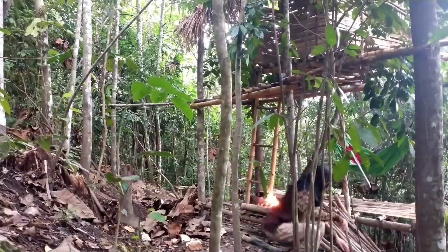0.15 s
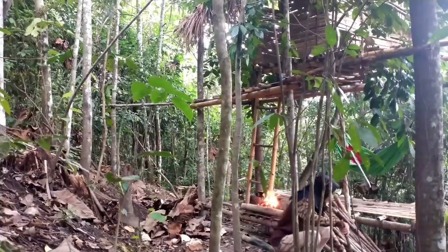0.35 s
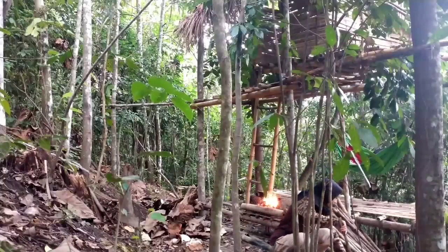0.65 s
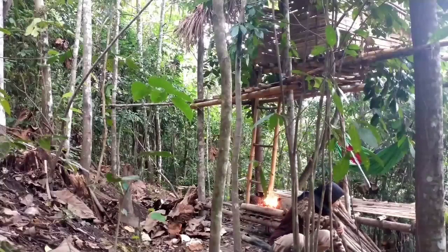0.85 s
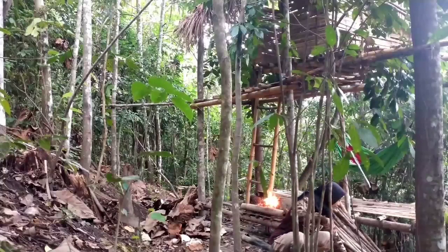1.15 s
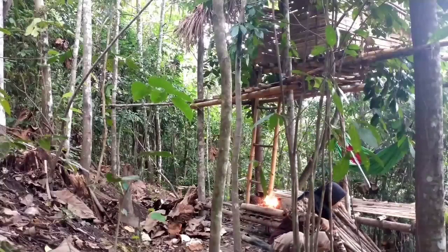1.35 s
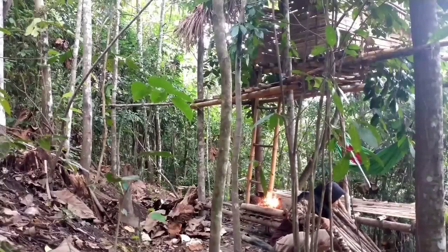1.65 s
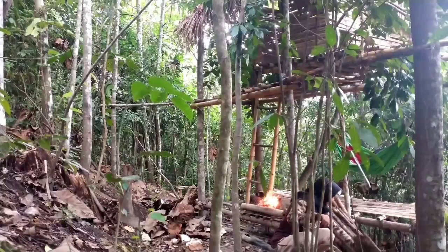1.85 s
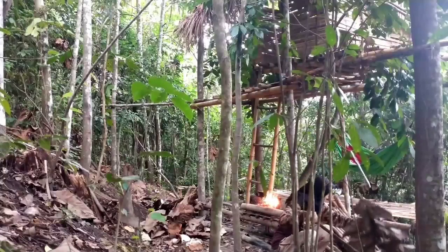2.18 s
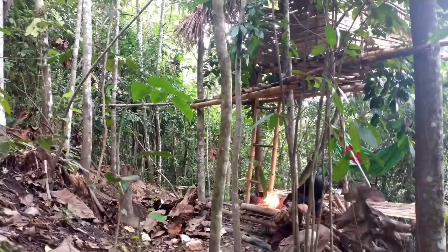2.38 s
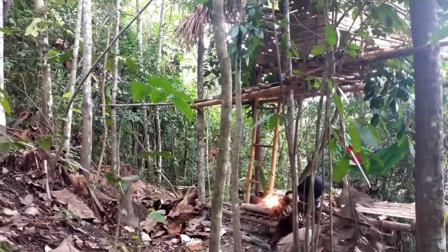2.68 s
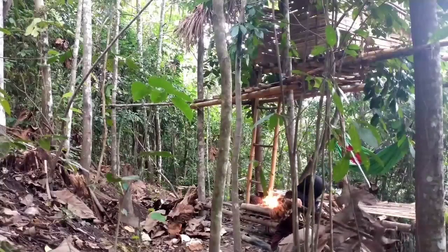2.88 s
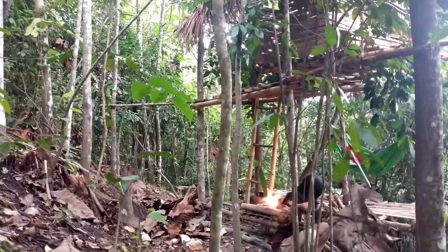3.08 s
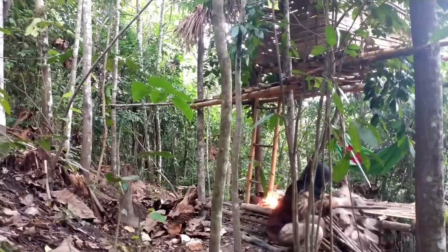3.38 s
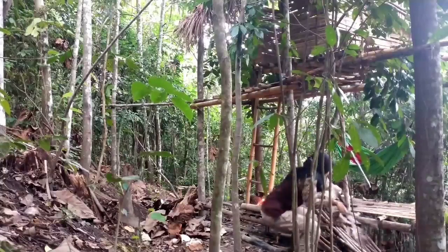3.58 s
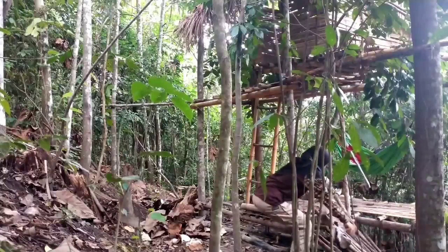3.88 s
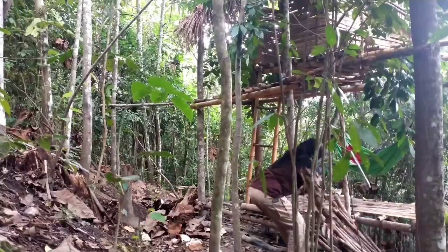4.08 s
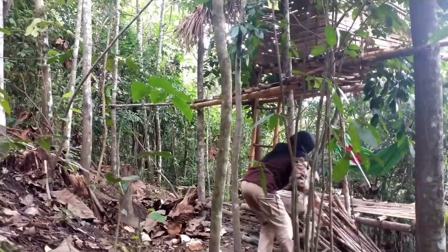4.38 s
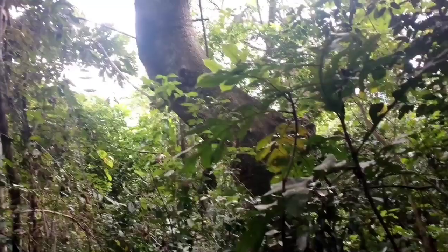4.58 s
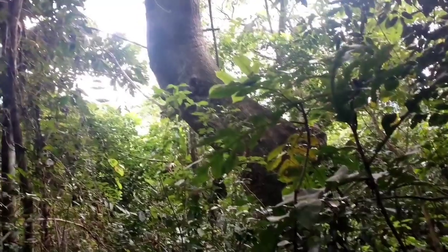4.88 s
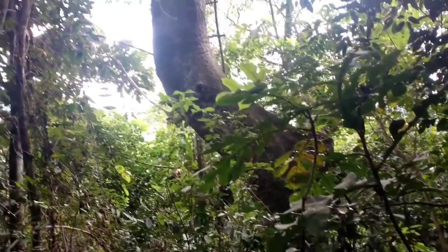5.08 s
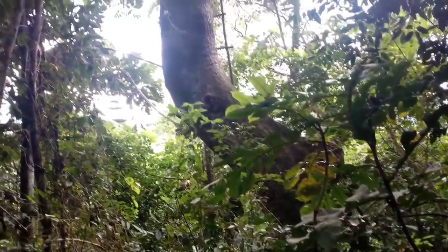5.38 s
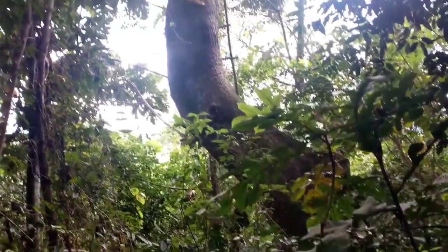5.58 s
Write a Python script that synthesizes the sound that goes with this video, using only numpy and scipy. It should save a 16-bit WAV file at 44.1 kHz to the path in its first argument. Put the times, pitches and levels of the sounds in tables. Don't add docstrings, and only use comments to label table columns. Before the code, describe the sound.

A steady cicada shimmer and airy hiss surround overlapping insect whistles around three kilohertz, the loudest in the middle. Leaves rustle and twigs tick, knock and crack at a short distance, ending in a brisk handful of snaps. Then a cut to a quieter forest spot, with no handling, a high near cicada swelling and faint distant whistles. Mono, outdoors, slight echoes off trunks.

```python
import sys
import numpy as np
from scipy import signal
from scipy.fft import rfft, irfft, next_fast_len
from scipy.io import wavfile
from scipy.ndimage import uniform_filter1d, map_coordinates

SR = 44100
rng = np.random.default_rng(int(sys.argv[2]) if len(sys.argv) > 2 else 0)


def bounce(signal):
    frames = np.transpose(np.atleast_2d(signal))
    limited = np.clip(frames, -1, 1)
    pcm = np.round(limited * 32767).astype(np.int16)
    wavfile.write(sys.argv[1], SR, pcm)


def volts_from_decibels(level):
    exponent = np.asarray(level, float) / 20
    return 10 ** exponent


N = 252957

# (time [s], level [dB])
AIR_COLOUR = [(250, -19.5), (1550, -17), (1700, -3), (2500, -6.5), (2900, -4.5), (3100, -10.5),
              (4200, -15.5), (6600, -18), (7000, -8.5), (8400, -9), (9600, -10.5), (10250, -13.5),
              (10500, -6), (11000, -6.5), (11900, -8), (12900, -6), (13800, -5.5), (14200, -8.5),
              (15300, -3)]
AIR_LEVEL = [(0, -49.5), (2, -47.5), (4.8, -51), (4.88, -54.5), (5.74, -49.5)]
# (time [s], level [dB])
RUMBLE_COLOUR = [(3, 10), (20, -10.5), (60, -14), (130, -20.5), (300, -31.5)]
RUMBLE_LEVEL = [(0, -55), (.1, -57.5), (4.8, -57.5), (4.9, -61), (5.74, -61.5)]
# (start [s], length [s], level at 3 kHz [dB per Hz], tilt [dB per octave])
LEAF_HANDFULS = [(0.023, 0.021, -86, -2), (.1, 0.26, -100, 0), (0.406, 0.17, -93.5, -1.3),
                 (0.992, 0.0092, -94, -2), (1.01, 0.17, -92, -2.5), (1.2, 0.27, -95.5, -4.5),
                 (1.438, 0.045, -93.5, -6), (1.505, 0.22, -96.5, -6), (1.754, 0.089, -99, -10),
                 (1.86, 0.26, -93, -5), (2.15, .02, -84, -4), (2.183, 0.027, -91.5, 4),
                 (2.216, 0.24, -90.5, -1.5), (2.481, 0.022, -88, -1.5), (2.553, 0.25, -101, -4.5),
                 (2.9, 0.51, -103, -1.5), (3.398, 0.45, -99, -1), (3.778, 0.26, -97.5, -4.5),
                 (4.134, 0.068, -84, -3.5), (4.219, 0.086, -86.5, -3.5), (4.3, 0.047, -90.5, -2.5),
                 (4.372, 0.042, -86.5, -2.5), (4.437, 0.036, -91.5, -4), (4.475, 0.047, -90.5, -3),
                 (4.587, 0.17, -96.5, -1.5), (4.792, 0.016, -95, 1)]
# (time [s], peak level [dB], pitch [Hz])
STICK_KNOCKS = [(0.988, -47.5, 1250), (1.184, -57, 1290), (1.332, -55, 800), (1.47, -54, 1320),
                (1.767, -54, 1360), (2.156, -49, 1490), (2.437, -52.5, 1150), (2.946, -56, 1275),
                (2.997, -60, 1500), (3.828, -61, 1230), (4.623, -55.5, 1226), (4.795, -52.5, 1260)]
# (time [s], peak level [dB], pitch [Hz])
DULL_THUDS = [
    (0.027, -50.5, 158),
    (0.987, -53, 452),
    (2.319, -56, 199),
    (4.484, -55, 400),
    (4.51, -60, 300),
]
# (time [s], peak level [dB], pitch [Hz])
STICK_CRACKS = [
    (.04, -40, 5130),
    (2.49, -33, 13000),
    (4.162, -35, 8000),
    (4.187, -38, 8300),
    (4.238, -38, 8300),
    (4.28, -40, 13000),
    (4.305, -34, 14500),
    (4.385, -36, 8900),
    (4.797, -39, 13500),
]
# (time [s], peak level [dB], pitch [Hz])
TWIG_TAPS = [(.03, -52, 3400), (.988, -48, 2520), (1.186, -47, 2400), (1.46, -49, 2200), (2.152, -47, 2300),
             (4.62, -53, 2500), (4.674, -43, 2240), (4.796, -44, 7500), (4.187, -43, 8100),
             (4.237, -42, 7700), (4.795, -50, 1900), (.988, -52, 750)]
# (time [s], peak level [dB], pitch [Hz])
TWIG_TICKS = [(2.1545, -34, 5500), (2.2015, -30, 11000), (2.212, -33, 9000), (4.162, -35, 8000),
              (4.177, -38, 11000), (4.186, -33, 8000), (4.2365, -31.5, 8100), (4.28, -35, 12000),
              (4.284, -34, 9000), (4.292, -40, 11000), (2.222, -39, 14000), (2.385, -40, 13000),
              (2.484, -39, 14500), (2.505, -38, 14500), (4.152, -38, 14000), (4.2216, -35, 14600),
              (4.305, -35, 14500), (4.33, -39, 13500), (4.378, -37, 12000), (4.382, -39, 11000),
              (4.388, -36, 13000), (4.398, -38, 14500)]
# (start [s], length
# [s], pitch [Hz], # width [Hz], level [dB])
RASPS = [
    (2.74, 0.75, 7600, 2100, -62.5),
    (1.75, 0.7, 3380, 790, -61),
    (4.85, 0.43, 5000, 1600, -71),
    (4.8, 1.2, 11300, 1900, -61),
    (5.2, 1, 12700, 1300, -57.5),
    (4.8, 1.3, 15000, 900, -66),
    (3, 0.17, 5600, 1500, -59),
    (4, .25, 2430, 58, -69),
    (4.85, 0.92, 2000, 79, -68.5),
]
# (pitch [Hz], width [Hz], level [dB])
LOW_RESONANCES = [(1807, 100, 6), (2017, 130, -3.5), (2138, 157, -2.5), (2303, 106, -4)]
# (time [s], pitch [Hz])
LOW_LOUDNESS = [(0, -57), (2.0, -58.5), (2.42, -55), (2.5, -61), (3.13, -62.5), (3.7, -60), (4.3, -55),
                (4.36, -59.5), (4.8, -57.5), (4.92, -62.5), (5.18, -56), (5.34, -57.5), (5.4, -54),
                (5.47, -57), (5.74, -54.5)]
LOW_PITCH = [(0, 1805), (1.65, 1810), (1.8, 1755), (2.9, 1755), (3.3, 1810), (4.3, 1790), (5.0, 1790),
             (5.3, 1830), (5.74, 1835)]
# (pitch [Hz], width [Hz], level [dB])
HIGH_RESONANCES = [(11020, 480, -3), (12700, 640, 0), (13200, 200, -10), (14580, 560, -2), (15080, 300, -8),
                   (10508, 30, -19), (10729, 20, -22), (11009, 14, -14), (11289, 30, -18), (12042, 24, -19),
                   (12300, 24, -20), (12590, 14, -16), (12690, 14, -18), (12803, 12, -13), (13189, 16, -19),
                   (14373, 14, -19), (14530, 14, -17), (14643, 10, -12), (14795, 12, -16), (15046, 14, -20),
                   (15120, 14, -19)]
# (time [s], factor [1])
HIGH_LOUDNESS = [(0, -48.5), (.9, -49), (1.7, -48.5), (1.85, -54.5), (2.05, -64), (3.3, -73), (3.42, -50),
                 (3.6, -49.5), (4.1, -48), (4.5, -50), (4.8, -49.5), (4.87, -60), (5.74, -72)]
HIGH_PITCH = [(0, 1.0), (1.68, 1.0), (1.9, .98), (3.2, .98), (3.3, 1.0), (5.74, 1.0)]
# (pitch [Hz], width [Hz], level [dB])
NEAR_RESONANCES = [(9250, 710, 1.5), (8890, 69, -8), (9090, 36, -3), (9234, 52, -2.5), (9340, 75, -6)]
# (time [s], factor [1])
NEAR_LOUDNESS = [(0, -48.5), (1.1, -50.5), (2.75, -52.5), (2.86, -55), (3.03, -53), (3.2, -55.5),
                 (3.4, -53.5), (3.54, -59.5), (3.98, -60), (4.07, -65), (4.17, -53), (4.28, -62),
                 (4.82, -62.5), (4.87, -62), (4.97, -49.5), (5.08, -52.5), (5.3, -50.5), (5.74, -49)]
NEAR_PITCH = [(0, 1.0), (1.4, 1.0), (2.2, .997), (3.4, .993), (3.6, .985), (4.8, .99), (4.9, .992),
              (5.2, .997), (5.74, 1.0)]
# (start [s], length [s], first pulse rate [per s], last pulse rate [per s], level [dB], rise [s])
TYMBAL_BUZZES = [
    (.42, .68, 142.45, 142.25, -56.5, .07),
    (1.02, .62, 144.6, 146.4, -58, .04),
    (2.765, .64, 150, 150, -50, .025),
    (4.49, .39, 143.1, 143.4, -57, .07),
    (4.86, .34, 143.6, 145.2, -71, .03),
]
# (pitch [Hz], level [dB], growth over the buzz [dB])
FIRST_OVERTONES = [(3132, -71, 10), (4413, -73, 8), (4982, -66, 0), (5125, -79, 21), (5267, -67, -4),
                   (5409, -69, 17), (5552, -69, -21), (5694, -74, 9), (5836, -76, -9), (5979, -70, 4),
                   (6263, -70, 4), (7402, -78, -21), (7545, -81, 21), (7829, -76, 3)]
ANSWER_OVERTONES = [(3200, -75, -21), (4510, -70, -6), (4655, -76, 14), (4801, -72, 0), (4946, -71, 5),
                    (5092, -72, -14), (5237, -67, 16), (5383, -76, -21), (5528, -69, 6), (6110, -70, 6),
                    (7565, -78, 12), (7856, -78, 3)]
LOUD_OVERTONES = [(3000, -73, 10), (3150, -59, -5), (3300, -72, 6), (3450, -72, -3), (3600, -74, 4),
                  (3750, -75, -9), (3900, -71, 3), (4350, -64, -5), (4500, -66, 6), (4650, -65, -6),
                  (4725, -71, 6), (4800, -74, 20), (4950, -62, -4), (5025, -75, -1), (5100, -65, 3),
                  (5250, -68, -1), (5400, -67, -1), (5475, -67, 5), (5550, -68, 3), (5625, -73, 21),
                  (5700, -73, 1), (5850, -69, 6), (5925, -72, 9), (6150, -64, 3), (6225, -68, 4),
                  (6375, -72, 16), (6450, -59, 3), (6600, -80, -20), (6750, -68, -4), (6900, -69, -21),
                  (7125, -78, 21), (7350, -70, 1), (7875, -72, 0), (7950, -70, 3), (8025, -73, 14),
                  (8175, -72, 4)]
SOFT_OVERTONES = [(2721, -73, -8), (3150, -72, -4), (3723, -80, -14), (4439, -77, -10), (4726, -76, 10),
                  (5012, -66, -1), (5155, -73, 12), (5298, -75, 21), (5442, -70, 1), (5728, -72, 21),
                  (6014, -70, 16), (6301, -74, 6), (6874, -83, 21), (7017, -77, 12), (7303, -77, 18),
                  (7733, -80, 13), (7876, -75, 21)]
# (start [s], length [s], first pitch [Hz], last pitch [Hz], level [dB])
THIN_WHISTLES = [(1.82, .34, 5550, 5740, -66), (2.04, .32, 5398, 5350, -66), (3.52, .38, 5508, 5518, -70),
                 (0, .42, 3520, 3500, -68), (3.6, .28, 3690, 3680, -70), (4.88, .3, 4240, 4300, -75),
                 (4.54, .28, 3150, 3150, -62), (2.06, .08, 3610, 3610, -60), (3.585, .05, 2960, 2965, -61),
                 (3.62, .2, 7300, 7300, -68), (4.86, .875, 4555, 4618, -70.5), (4.8, .1, 9100, 9110, -58),
                 (4.88, .24, 9120, 9150, -48.5), (5.1, .635, 9150, 9205, -54)]
# (start [s], length [s], top pitch [Hz], slow climb [Hz], opening scoop [Hz])
FAR_CALLS = [
    (2.85, .95, 2975, 120, 0),
    (2.95, .53, 2865, 105, 30),
    (4.785, .1, 2990, 165, 310),
    (5.33, .41, 2975, 170, 110),
    (5.64, .1, 2980, 165, 75),
    (3.8, .14, 3005, 160, 260),
]
NEAR_CALLS = [
    (0, .6, 3015, 130, 0),
    (.405, .68, 2953, 160, 250),
    (1.33, .72, 3040, 140, 200),
    (2.2, .68, 3075, 140, 290),
    (3.86, .82, 3005, 170, 180),
]
# (time [s], level [dB], width [s])
FAR_CALL_BEADS = [
    [(2.93, -53.5, 0.038), (3.0, -84, 0.043), (3.1, -64, 0.023), (3.21, -61, 0.033), (3.31, -55, .015),
     (3.35, -58, 0.02), (3.42, -70, 0.025)],
    [(3.03, -62, .06), (3.15, -60, 0.099), (3.36, -53.5, 0.039)],
    [(4.83, -58, 0.027)],
    [(5.43, -78, .03), (5.5, -61, 0.028), (5.55, -67, 0.015)],
    [(5.67, -58, .02), (5.72, -56, 0.036)],
    [(3.85, -58, 0.028)],
]
NEAR_CALL_BEADS = [
    [(.02, -48, 0.022), (.075, -41, 0.026), (.105, -43.5, 0.012), (.15, -43.5, 0.021), (.22, -39, 0.014),
     (.28, -52, 0.02), (.34, -49.5, 0.043), (.41, -45, 0.031)],
    [(.435, -48, 0.019), (.47, -47, 0.015), (.505, -45.5, 0.018), (.6, -47, 0.078), (.715, -44.5, 0.032),
     (.775, -51, 0.018), (.82, -57, 0.015), (.88, -49.5, 0.024), (.965, -48.5, 0.031), (1.035, -61, 0.012)],
    [(1.41, -57, 0.024), (1.51, -52, 0.057), (1.61, -55, 0.0091), (1.69, -53.5, 0.053),
     (1.79, -48.5, 0.027), (1.86, -76, 0.022), (1.97, -64, 0.033)],
    [(2.225, -46, 0.02), (2.26, -39, 0.013), (2.3, -42, 0.027), (2.385, -36, 0.035), (2.45, -54, 0.016),
     (2.525, -40.5, 0.035), (2.645, -36, 0.049), (2.75, -34, 0.042)],
    [(3.88, -44, 0.009), (3.914, -43.5, 0.01), (3.955, -48, 0.018), (4.03, -45, 0.021), (4.112, -41, 0.023),
     (4.185, -45, 0.029), (4.24, -50, 0.016), (4.275, -45, 0.013), (4.33, -65, 0.0086), (4.378, -47, 0.035),
     (4.455, -52, 0.033), (4.53, -63, 0.038), (4.61, -69, 0.024)],
]
# (multiple of pitch [1], level [dB])
WHISTLE_SIDE_LINES = [
    (.8, -28),
    (.9, -16),
    (1.1, -20),
    (1.2, -30),
    (2, -30),
]
# (delay [s], level [dB])
TRUNK_ECHOES = [
    (.021, -13),
    (.037, -14),
    (.058, -17),
]

RUSTLE_RISE_S, RUSTLE_FALL_DB_PER_S, DULL_DB_PER_OCT = 0.026, 225, 3.5
RUSTLE_SAG_DB, CLUMP_DB = -2, 1.6
STEADY, STEADY_S = .6, .04
BUZZ_SCOOP, BUZZ_WAVER = .985, .00045
BUZZ_END_SHARE, BUZZ_FADE_SHARE = .77, .85
BUZZ_ENDS_DB, ROUGH_HELD, ROUGH_END = -16, .14, .95
THIN_ENDS_DB = -5
CLIMB_S, SCOOP_S = .4, .04
NEAR_BETWEEN_DB, FAR_BETWEEN_DB = -61.5, -70
EDGE_HZ, OFFSET = 15470, -.0002


def evened(x):
    return x / np.sqrt(np.mean(x ** 2) + 1e-20)


def add(mix, s, sound):
    part = mix[max(round(s * SR), 0):][:len(sound)]
    part += sound[:len(part)]


def columns(rows):
    s, *values = np.transpose(rows)
    t = np.arange(s[0], s[-1], 1 / SR)
    return s[0], [np.interp(t, s, v) for v in values]


def over_time(rows, rule=np.asarray):
    return rule(np.interp(np.arange(N) / SR, *np.transpose(rows)))


def wander(n, per_s):
    knots = rng.standard_normal(int(n / SR * per_s) + 3)
    return map_coordinates(knots, [np.arange(n) / SR * per_s], order=3)


def resonate(x, modes):
    size = next_fast_len(len(x))
    f = np.fft.rfftfreq(size, 1 / SR)
    gain = sum(volts_from_decibels(db) / np.sqrt(width) / (1 + 2j * (f - hz) / width) ** 2 for hz, width, db in modes)
    return evened(irfft(rfft(x, size) * gain, size)[:len(x)])


def shaped_noise(db, size):
    hop = size // 4
    frames, hz = N // hop + 5, np.fft.rfftfreq(size, 1 / SR)
    a, b = rng.standard_normal((frames, len(hz), 2)).T
    z = (a + 1j * b) * volts_from_decibels(db(hz[:, None], np.arange(frames) * hop / SR))
    return signal.istft(z, nperseg=size, noverlap=size - hop)[1][:N]


def blurred(x, rows, cols):
    return uniform_filter1d(uniform_filter1d(x, size=rows, axis=0), size=cols, axis=1)


def trunks(x, t60):
    at = np.arange(300, SR // 2, 22)
    at = at + rng.integers(0, 22, len(at))
    taps = np.zeros(SR // 2 + 22)
    taps[at] = rng.choice([-1., 1.], len(at)) * volts_from_decibels(-60 * at / SR / t60)
    return signal.fftconvolve(x, taps / np.linalg.norm(taps))[:N]


def air():
    def colour(points):
        f, level = np.transpose(points)

        def at(hz, t):
            patches = 2.5 * evened(blurred(rng.standard_normal((len(t), len(hz))).T, 2, 30))
            return np.interp(np.log(hz + 1), np.log(f + 1), level) + patches
        return at

    rumble = evened(shaped_noise(colour(RUMBLE_COLOUR + [(2000, -59)]), size=8192))
    hiss = evened(shaped_noise(colour(AIR_COLOUR), size=2048))
    return hiss * over_time(AIR_LEVEL, volts_from_decibels) + rumble * over_time(RUMBLE_LEVEL, volts_from_decibels)


def leaves():
    def colour(hz, t):
        octaves = np.log2(np.clip(hz, 200, 10000) / 3000)
        power = 1e-16
        for s, length, db, tilt_db in LEAF_HANDFULS:
            rise = np.clip((t - s) / RUSTLE_RISE_S + 1, 0, 1)
            fall_db = -RUSTLE_FALL_DB_PER_S * np.maximum(t - s - length, 0)
            sag_db = RUSTLE_SAG_DB * np.clip((t - s) / length - .5, -.5, .5)
            shape = rise * volts_from_decibels(fall_db + sag_db)
            power = power + (volts_from_decibels(db + tilt_db * np.maximum(octaves, -1.5)) * shape) ** 2
        clumps = evened(blurred(rng.standard_normal((len(t), len(hz))), 9, 14).T)
        dull_db = DULL_DB_PER_OCT * np.minimum(octaves + 0.5, 0)
        return CLUMP_DB * clumps + 10 * np.log10(power) + dull_db

    unit = np.std(shaped_noise(lambda hz, t: 0 * hz * t, size=256)) * volts_from_decibels(CLUMP_DB / 2)
    bursts = rng.exponential(1, N // 40 + 1) ** 1.76
    crackle = evened(1 + 0.5 * uniform_filter1d(bursts, size=3).repeat(40)[:N] / 3)
    return shaped_noise(colour, size=256) / unit * np.sqrt(SR / 2) * crackle * volts_from_decibels(-4.0)


def snaps(events, t60, crack, rise):
    out, t = np.zeros(N), np.arange(SR // 10) / SR
    for s, db, hz in events:
        noise = resonate(rng.standard_normal(len(t)), [(hz, 1.0 * hz, 0)])
        ring = np.sin(2 * np.pi * hz * t) + crack * noise
        add(out, s, volts_from_decibels(db - 60 * t / t60) * ring * np.minimum(t / rise, 1))
    return out


def moved_sticks():
    sticks = snaps(STICK_KNOCKS + DULL_THUDS, 0.053, 0.95, 0.00083)
    sticks += volts_from_decibels(-12) * snaps(STICK_CRACKS, .02, 2.5, .002)
    sticks += snaps(TWIG_TAPS, .03, .45, .002)
    sticks += snaps(TWIG_TICKS, .003, .8, .0001)
    return sticks + volts_from_decibels(-9) * trunks(sticks, .2)


def rasp(start, length, hz, width, db):
    n = round(length * SR)
    clicks = resonate(rng.standard_normal(n), [(hz, width, 0)])
    return start, volts_from_decibels(db) * clicks * signal.windows.tukey(n, .4)


def cicada(modes, effort, clicks_per_s, throb_per_s, throb, drift=1):
    clicks = rng.standard_normal(N) * (rng.random(N) < clicks_per_s / SR)
    ring = signal.hilbert(resonate(clicks, modes), next_fast_len(N))[:N]
    span = round(STEADY_S * SR)
    swell = uniform_filter1d(uniform_filter1d(abs(ring), span), span)
    ring = ring / swell ** STEADY
    beat = 1 + throb * np.sin(2 * np.pi * np.cumsum(throb_per_s * (1 + .08 * wander(N, 4))) / SR)
    shift = np.exp(2j * np.pi * np.cumsum((drift - 1) * modes[0][0] * np.ones(N)) / SR)
    return over_time(effort, volts_from_decibels) * evened((ring * shift).real * beat)


def cicada_chorus():
    near = cicada(NEAR_RESONANCES, NEAR_LOUDNESS, 10000, 33, .17, over_time(NEAR_PITCH))
    chorus = signal.sosfilt(signal.butter(3, [8780, 9600], "band", fs=SR, output="sos"), near)
    chorus += cicada(HIGH_RESONANCES, HIGH_LOUDNESS, 14000, 36, .08, over_time(HIGH_PITCH))
    for row in RASPS:
        add(chorus, *rasp(*row))
    low = cicada(LOW_RESONANCES, LOW_LOUDNESS, 3000, 27, .15, over_time(LOW_PITCH) / 1807)
    return chorus + signal.sosfilt(signal.butter(8, 1650, "high", fs=SR, output="sos"), low)


def buzz_course(start, length, first, last, db, rise):
    t = np.array([0, rise, BUZZ_END_SHARE * length, BUZZ_FADE_SHARE * length, length])
    rate = first * np.where(t > 0, 1, BUZZ_SCOOP) + (last - first) * t / length
    level = db + BUZZ_ENDS_DB * np.array([.7, 0, 0, .05, 1])
    rough = [ROUGH_END / 2, ROUGH_HELD, ROUGH_HELD, ROUGH_END, ROUGH_END]
    return list(zip(start + t, rate, level, rough))


def buzz(rows, overtones, width=260, between_db=-4):
    s, (rate, db, rough) = columns(rows)
    n = len(rate)
    rate = rate * (1 + BUZZ_WAVER * wander(n, 12))
    turns, mean = np.cumsum(rate) / SR, np.median(rate)
    rough = np.clip(rough, 0, 1) ** 1.5
    share = np.clip(np.linspace(-.05, 1.15, n), 0, 1)
    body = [(hz, width, line_db) for hz, line_db, _ in overtones]
    puffs = (0.67 + np.exp(-(turns % 1) / 0.37)) * rng.standard_normal(n)
    strong_weak = 1 + .6 * (-1) ** np.floor(turns)
    pulses = np.diff(np.floor(turns), prepend=0) * strong_weak
    clear = 0
    for hz, line_db, growth_db in overtones:
        k = np.round(2 * hz / mean) / 2
        toward_weak = share if growth_db < 0 else 1 - share
        course_db = abs(growth_db) * (1 / 3 - toward_weak ** 2)
        fading = volts_from_decibels(line_db + course_db + 2.3 * wander(n, 12) + 2.2 * wander(n, 30))
        clear = clear + fading * np.sin(2 * np.pi * (k * turns + rng.random()))
    clear = evened(evened(clear) + volts_from_decibels(between_db) * resonate(pulses, body))
    return s, volts_from_decibels(db) * (np.sqrt(1 - rough) * clear + np.sqrt(rough) * resonate(puffs, body))


def thin(start, length, first_hz, last_hz, db):
    share = np.linspace(0, 1, num=9)
    hz = first_hz + share * (last_hz - first_hz)
    return list(zip(start + share * length, hz, db + THIN_ENDS_DB * (2 * share - 1) ** 4))


def call(row, beads, between_db):
    start, length, top_hz, climb_hz, scoop_hz = row
    t = np.arange(0, length, .005)
    hz = top_hz - climb_hz * np.exp(-t / CLIMB_S) - scoop_hz * np.exp(-t / SCOOP_S)
    level = volts_from_decibels(between_db) + sum(volts_from_decibels(db) * np.exp(-((start + t - s) / width) ** 2) for s, db, width in beads)
    return list(zip(start + t, hz, 20 * np.log10(level)))


def whistle(rows, sides, waver_hz, flutter_db, faint_db):
    s, (hz, level) = columns([(t, f, volts_from_decibels(db) * volts_from_decibels(min(db - faint_db, 0))) for t, f, db in rows])
    n = len(hz)
    turns = np.cumsum(hz + waver_hz * wander(n, 58.3)) / SR
    tone = level * np.sin(2 * np.pi * turns) * volts_from_decibels(flutter_db * wander(n, 70))
    effort = uniform_filter1d(level, SR // 4) * np.minimum(np.arange(n) / SR / .15, 1)
    for k, side_db in sides:
        fading = volts_from_decibels(side_db + 3.5 * wander(n, 12) + 3.5 * wander(n, 40))
        tone = tone + effort * fading * np.sin(2 * np.pi * (k * turns + rng.random()))
    return s, 0.86 * tone * signal.windows.tukey(n, .04)


def singing_insects():
    singers = np.zeros(N)
    for row, beads in zip(NEAR_CALLS, NEAR_CALL_BEADS):
        add(singers, *whistle(call(row, beads, NEAR_BETWEEN_DB), WHISTLE_SIDE_LINES, 5.5, 1.6, -62))
    for row, beads in zip(FAR_CALLS, FAR_CALL_BEADS):
        add(singers, *whistle(call(row, beads, FAR_BETWEEN_DB), WHISTLE_SIDE_LINES[1:2], 7., 2.2, -68))
    direct = singers.copy()
    for s, db in TRUNK_ECHOES:
        add(singers, s, volts_from_decibels(db) * direct)
    for row in THIN_WHISTLES:
        add(singers, *whistle(thin(*row), [], 9., 3., -74))
    overtone_sets = [FIRST_OVERTONES, ANSWER_OVERTONES, LOUD_OVERTONES, SOFT_OVERTONES, SOFT_OVERTONES[2:]]
    for row, overtones in zip(TYMBAL_BUZZES, overtone_sets):
        add(singers, *buzz(buzz_course(*row), overtones))
    return singers + volts_from_decibels(-17) * trunks(singers, .35)


def scene():
    mono = air() + leaves() + moved_sticks() + cicada_chorus() + singing_insects()
    return np.array([mono, mono])


def top_cut(x):
    return signal.sosfilt(signal.butter(12, 16750, fs=SR, output="sos"), x)


def record(dry):
    low_pass = signal.firwin(2047, EDGE_HZ, window=("kaiser", 9), fs=SR)
    limited = signal.oaconvolve(dry, low_pass[None], "same")
    return top_cut(limited + OFFSET)


dry = scene()
out = record(dry)
bounce(out)
```